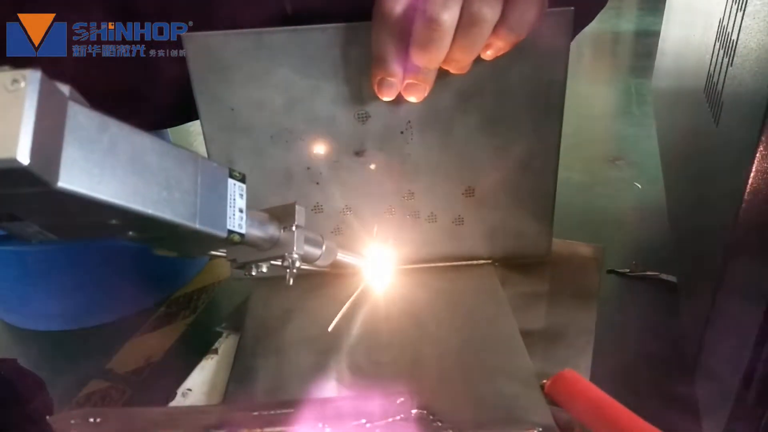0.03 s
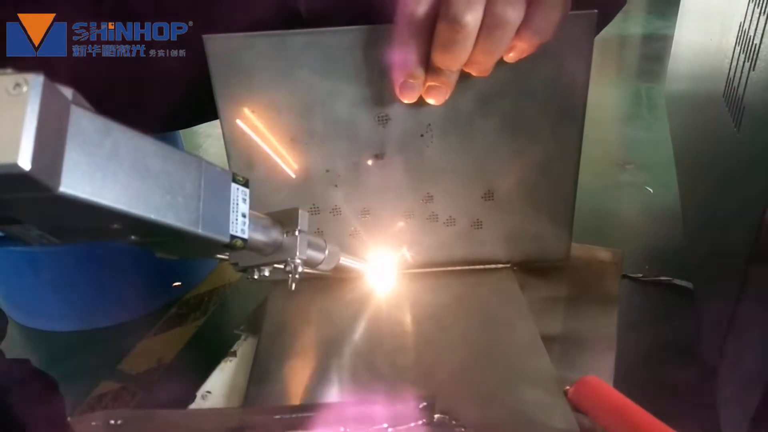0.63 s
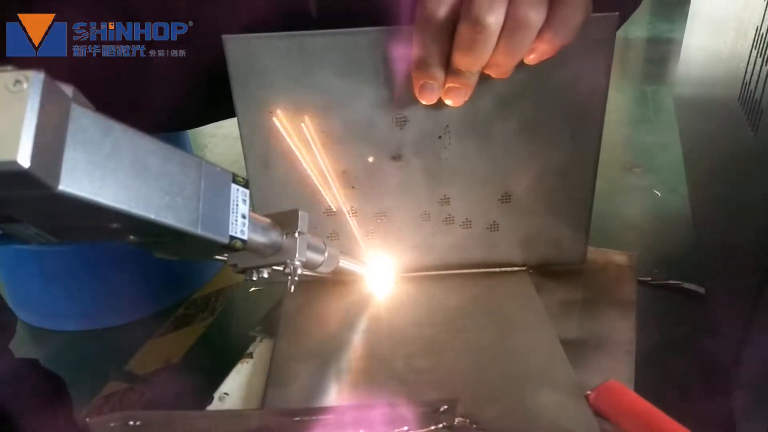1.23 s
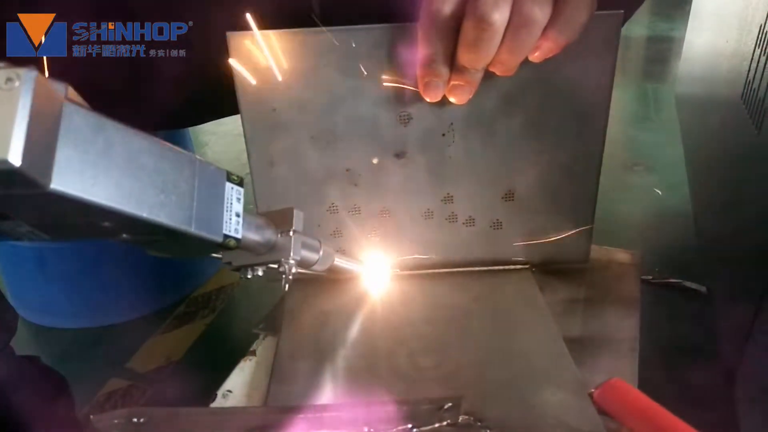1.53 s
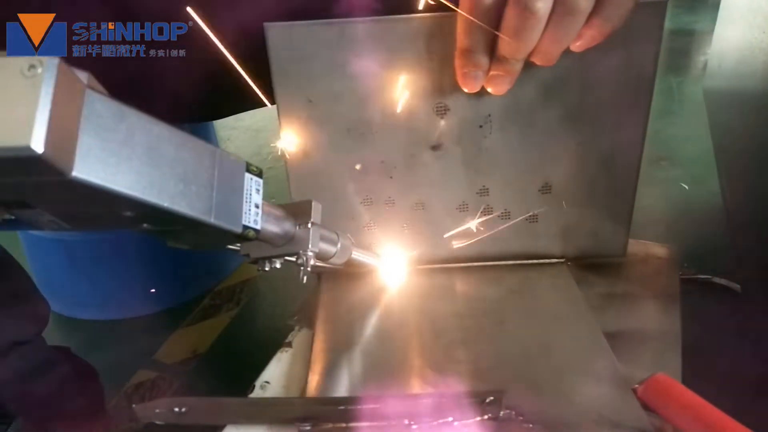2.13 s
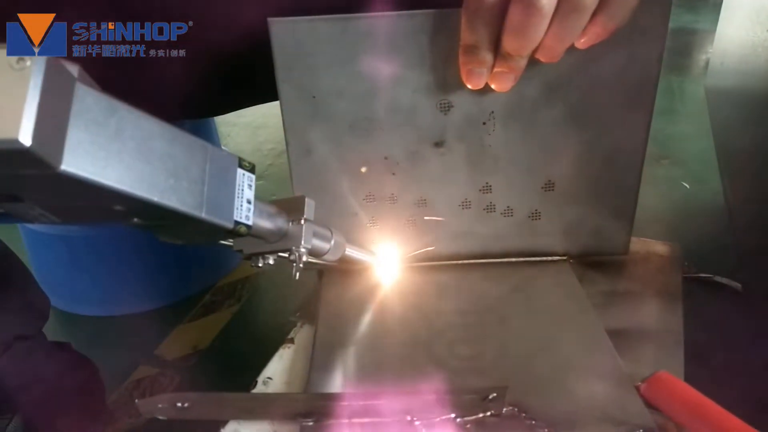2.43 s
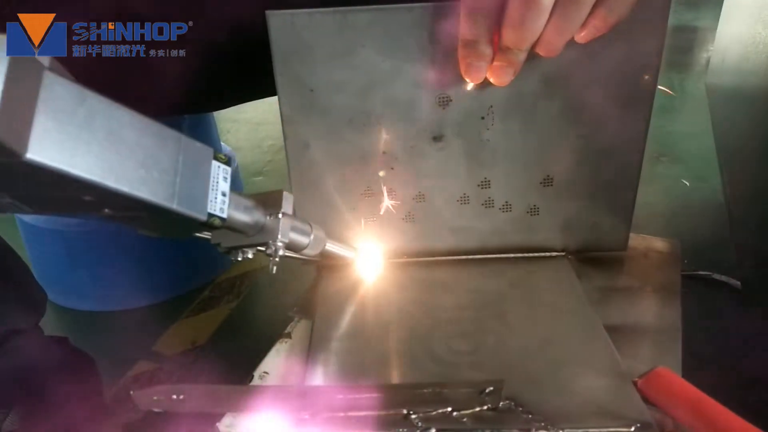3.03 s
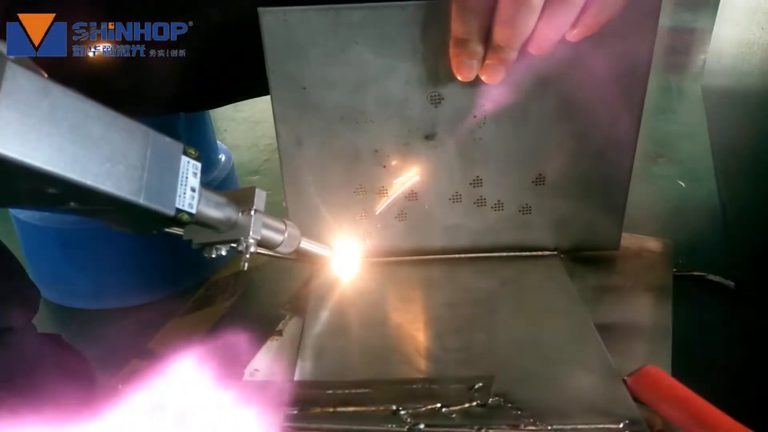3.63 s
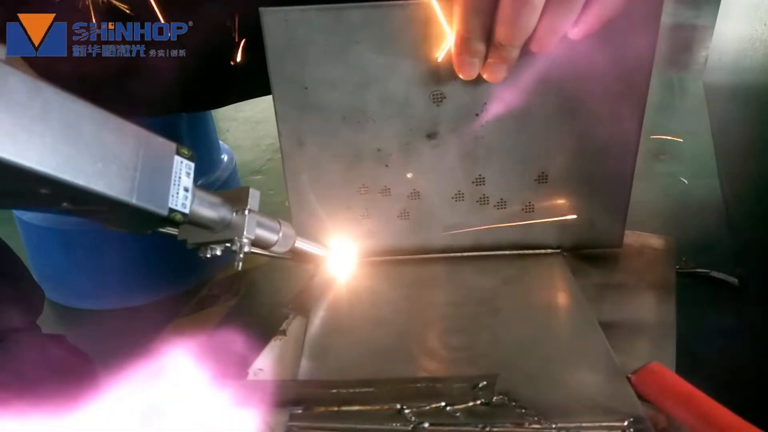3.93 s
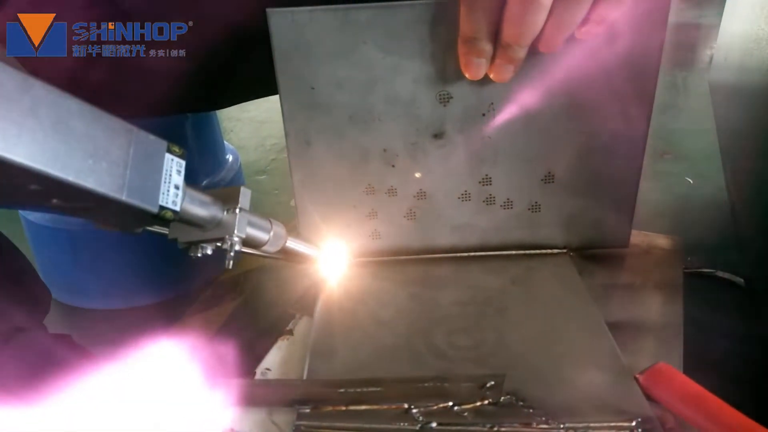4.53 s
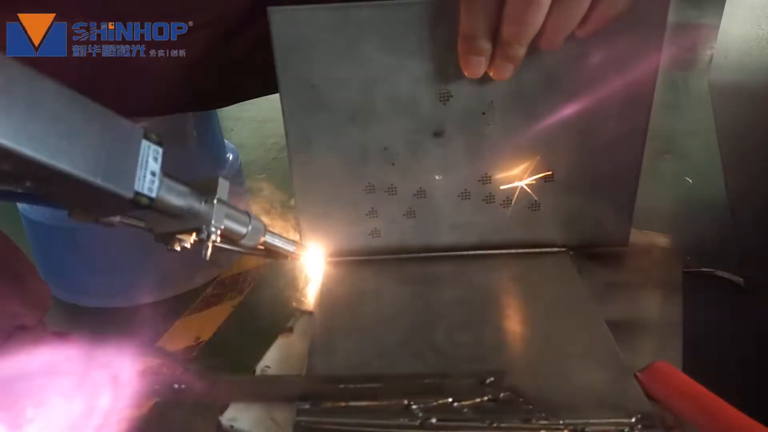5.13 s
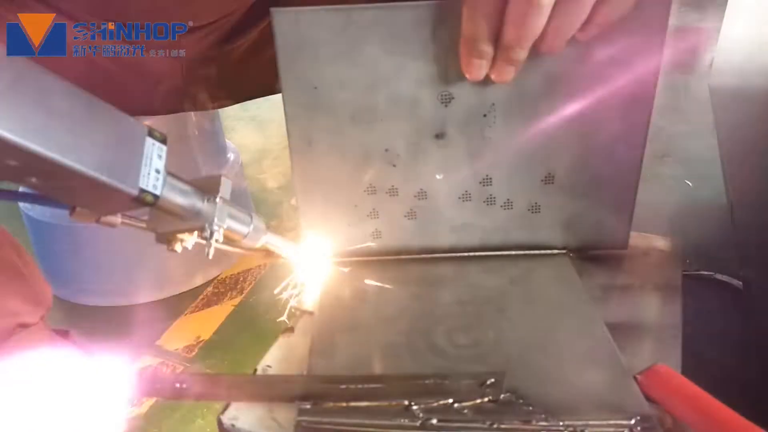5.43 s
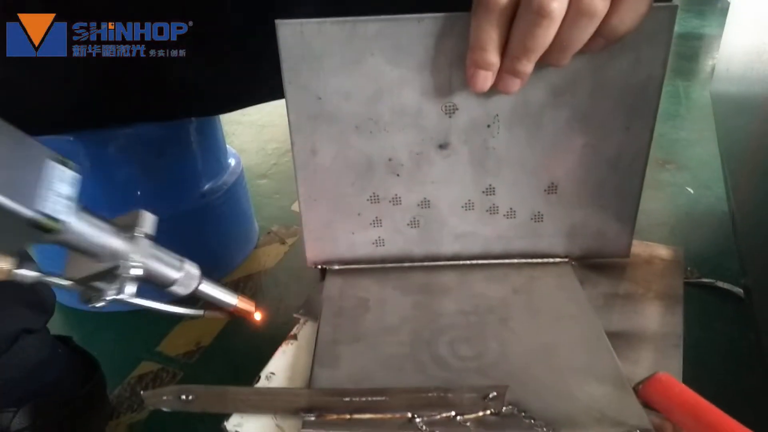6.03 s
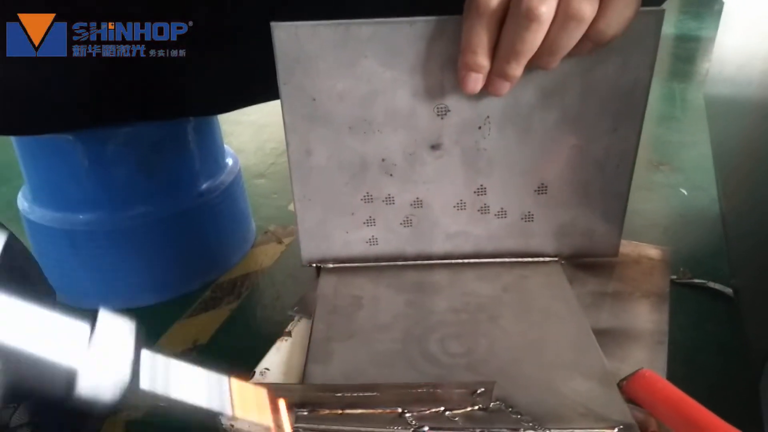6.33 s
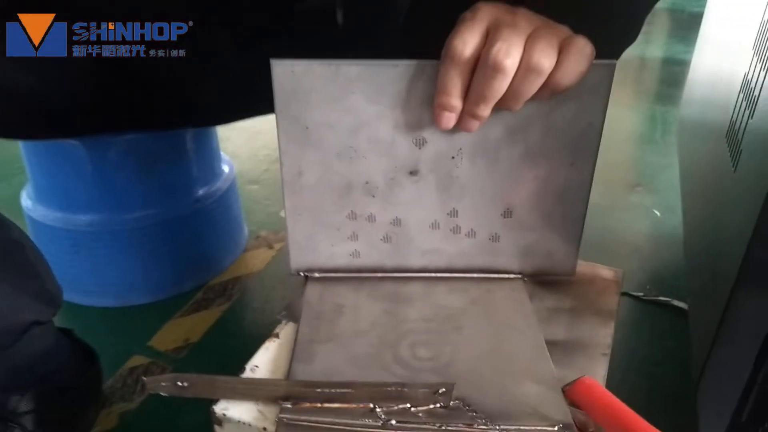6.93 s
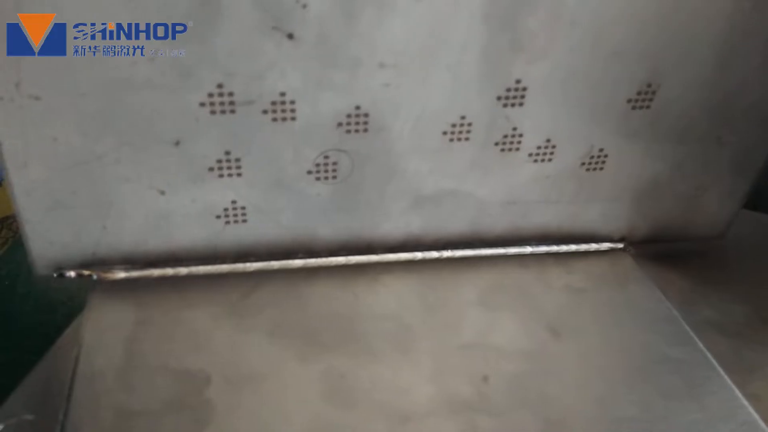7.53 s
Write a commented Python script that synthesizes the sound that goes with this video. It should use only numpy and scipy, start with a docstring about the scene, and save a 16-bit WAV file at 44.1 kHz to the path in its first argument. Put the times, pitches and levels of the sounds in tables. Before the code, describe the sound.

A handheld welding gun hisses and crackles loudly on steel, stops and sputters once, leaving workshop hum and a faint knock.

```python
"""In a workshop, a handheld laser gun welds the corner of two steel sheets.
The swinging beam boils the metal in fifty crackling bursts a second, stops, and sputters once more.
Shield gas whistles through the nozzle until its valve shuts. An automatic gain control turns the
loud weld down; as it recovers, mains hum and room rumble swell. A few knocks ring the bench,
a sleeve and hand brush the steel, and a thin whine steps up near the end."""
import sys
import numpy as np
from scipy import signal
from scipy.fft import rfft, irfft
from scipy.io import wavfile
from scipy.ndimage import uniform_filter1d, minimum_filter1d, map_coordinates

SR = 44100
rng = np.random.default_rng(int(sys.argv[2]) if len(sys.argv) > 2 else 0)


def dump(signal):
    """Clip the signal to [-1, 1] and save it as 16-bit WAV at the path in sys.argv[1]."""
    limited = np.clip(np.atleast_2d(signal).T, -1, 1)
    pcm = np.round(limited * 32767).astype(np.int16)
    wavfile.write(sys.argv[1], SR, pcm)


N = 343098
TIME = np.arange(N) / SR
BINS = np.fft.rfftfreq(4096, 1 / SR)  # the frequencies in Hz at which filters are set

SWING_HZ = 49.981  # swings of the beam per second
TAPER_S, STOP_S = 4.33, 5.24  # the pool of molten metal starts to weaken; the beam stops
SEAM_TIMES_S = [.75, 1.55, 2.5, 4.3]  # when the gun passes the four places below
NOZZLE_TIMES_S = [5.45, 5.8, 6.02, 6.17]  # nozzle leaves the sheet, is clear; flow weakens, is dying

# Resonances of the corner between gun and sheets, at four places along the seam.
# Each row: pitch in Hz, width in Hz, relative level in dB.
SEAM_START = [(1610, 280, -12.5), (1950, 90, -14), (2460, 220, -14), (3010, 410, -12.5), (3440, 47, -5),
              (4160, 890, -13), (4970, 270, -7.5), (5530, 500, -1), (6040, 500, -1), (6490, 270, 3),
              (7150, 630, -2.5), (8230, 570, -12.5), (9300, 1970, -17), (10100, 410, -9),
              (10880, 1440, -9.5), (13100, 250, -10.5), (14400, 1000, -10.5)]
SEAM_EARLY = [(1574, 160, -9), (2220, 3400, -18), (3080, 130, -8.5), (3460, 88, -7), (3900, 120, -10),
              (4230, 180, -4.5), (5000, 230, -3.5), (5600, 980, 0), (6580, 680, -1), (7260, 350, -3),
              (7900, 200, -15), (8480, 140, -9.5), (9000, 610, -11), (10050, 800, -7.5),
              (11600, 2000, -11.0), (14200, 880, -7), (15360, 240, -9.0)]
SEAM_HALFWAY = [(1496, 370, -8.5), (1690, 3000, -11.5), (2270, 64, -4.5), (3110, 76, -4), (3540, 180, 1),
                (3830, 130, -4), (4177, 78, 3.5), (4980, 500, 1), (5740, 1140, 4.5), (6470, 780, 5.5),
                (7120, 230, 0), (8350, 780, -6), (9100, 290, -11), (9520, 180, -3.5), (10300, 740, -3.5),
                (11000, 1100, -3), (13600, 710, -2.5), (14300, 920, -6), (15300, 860, -5)]
SEAM_END = [(1755, 42, -7), (1930, 2900, -21.5), (2316, 170, -9), (3110, 280, -17), (3526, 320, -5),
            (3907, 73, -2.5), (4210, 55, -6), (4940, 160, -2), (5260, 600, 0), (5470, 850, 1),
            (6720, 860, 1), (7810, 140, -15), (8260, 160, -2.5), (8820, 490, -9.5), (9590, 370, -4),
            (10170, 770, -0.5), (11750, 890, -4.5), (13950, 650, -4), (14600, 2000, -6.5)]
# The broad roar under those resonances. Each row: frequency in Hz, relative level in dB.
WELD_ROAR = [(100, -35.5), (300, -29.5), (600, -17.5), (1000, -16.5), (2000, -18), (3000, -22), (4600, -26),
             (8000, -16), (12700, -28), (15500, -46)]
# Surges and lulls of the pool. Each row: middle in seconds, change in dB, half length in seconds.
POOL_SURGES = [(0.205, 0.7, 0.46), (1.15, -0.8, 0.36), (1.42, 1, .12), (1.94, -1, 0.078),
               (4.23, 2.2, 0.054), (4.943, 5, .014), (5.106, 1.5, 0.041), (5.24, -2.5, .05)]
# Drone of the gun's swinging mirror. Each row: multiple of the swing rate, relative level in dB.
MIRROR_TONES = [(3, -71), (8, -62), (11, -69.5)]
# Resonances of the gas nozzle on the sheet, in free air, and as the flow dies.
# Each row: pitch in Hz, width in Hz, relative level in dB.
NOZZLE_ON_SHEET = [(822, 180, -14.5), (1450, 710, -18), (1755, 68, -5.5), (2370, 300, -16), (2990, 460, -9),
                   (3580, 270, -7.5), (4020, 145, -2), (5430, 500, -5), (6760, 254, 2.5), (7520, 240, -8.0),
                   (8940, 450, -19.5), (9850, 390, -14.5), (11240, 210, -17), (13240, 1300, -22),
                   (15120, 410, -24)]
NOZZLE_IN_AIR = [(570, 1700, -0.5), (1830, 160, 7), (2390, 250, 5.5), (2790, 810, 6), (3940, 730, 5),
                 (5540, 390, 12), (6760, 340, 12.5), (7520, 220, 12), (9020, 400, -4.5), (9930, 820, -7.5),
                 (11250, 320, -9.5), (13080, 580, -9.0), (15100, 420, -8)]
NOZZLE_LOW_FLOW = [(1766, 210, 11), (3980, 930, 10.5), (5730, 500, 12), (6700, 400, 12.5), (7250, 400, 11),
                   (9150, 350, -0.5), (9850, 300, -4), (11300, 400, -13), (13100, 500, -10),
                   (15100, 600, -9)]
# The broad rush of the gas jet. Each row: frequency in Hz, relative level in dB.
JET_RUSH = [(100, -42), (300, -26.5), (1000, -26.5), (2500, -18.5), (4600, -22), (8500, -38), (12300, -44),
            (15500, -36)]
# Knocks on the bench. Each row: start in seconds, relative level in dB, brightness in dB per octave.
BENCH_KNOCKS = [(.001, -4, -1), (.176, -2.5, -3), (.193, -9.5, 0), (7.209, -13.5, -1), (7.285, -31, -14)]
# How the bench rings. Each row: pitch in Hz, relative level in dB, seconds to fade by 60 dB.
BENCH_MODES = [(133, -10.5, 0.25), (216, -5, 0.034), (324, -8, 0.029), (462, -1.5, 0.062),
               (580, -15, 0.077), (856, -31, 0.026), (1326, -7.5, 0.07), (1620, -14, .04)]
# Sleeve and hand brushing steel. Each row: start in seconds, peak level in dB, rough length in seconds.
SLEEVE_STROKES = [(6.417, -57.5, 0.18), (6.615, -58, .06), (6.702, -52, 0.11), (6.82, -60, 0.1),
                  (7.159, -53, 0.047), (7.29, -51, .003)]
# The tone colour of that brushing. Each row: frequency in Hz, relative level in dB.
BRUSH_COLOUR = [(1000, -3), (4000, -8), (6500, 7), (10000, 0), (12000, -6), (15000, -7)]
# Transformer hum. Each row: multiple of the mains frequency, level in dB.
HUM_TONES = [(2, -30), (4, -47.5), (6, -44), (8, -66), (10, -57), (16, -62.5)]
# Tones of a fan. Each row: pitch in Hz, relative level in dB.
FAN_TONES = [(862, -54.5), (1030, -65), (348, -52)]
# The rumble of the room. Each row: frequency in Hz, relative level in dB.
RUMBLE_COLOUR = [(20, -15), (50, -27), (90, 2.5), (140, 1), (250, -6.5), (450, -11), (800, -13),
                 (2200, -18.5), (3200, -24), (4300, -26), (5500, -33.5), (7000, -35.5), (10000, -44),
                 (12000, -51), (15500, -54)]
# Soft swells of the rumble. Each row: middle in seconds, change in dB, half length in seconds.
RUMBLE_SWELLS = [(5.044, 3, 0.054), (5.55, 0, 0.038), (6.075, 3.5, 0.078)]
# A thin whine in the room. Each row: pitch in Hz, width in Hz, relative level in dB.
WHINE_BANDS = [(802, 15, 8), (4550, 165, 0), (6570, 400, -17), (9400, 360, -21)]


def weld(boil_db=-10, taper_db_per_s=8.5, calm_db_per_s=2.5, buzz_db=-29, mirror_db=17):
    """The boiling pool hisses through the changing corner while the swinging mirror drones."""
    lag_s = 0.0025 - 0.0031 * (TIME > 2.02)  # the rhythm skips ahead once
    calm = gain_of(-calm_db_per_s * since(TAPER_S))  # a weaker pool simmers less between bursts
    flow = bursts(lag_s, return_db=-15, width_s=.0036, warmth=.32 * calm, simmer=.19 * calm)
    vapour = echoes(boil(flow))
    hiss = morph(vapour, SEAM_TIMES_S, (SEAM_START, SEAM_EARLY, SEAM_HALFWAY, SEAM_END), WELD_ROAR)
    # each burst also pushes the air: a faint low buzz
    buzz = colour(flow - flow.mean(), slope([(50, -19.5), (100, -17.5), (150, 11.5), (500, .5), (1500, 3)]))
    mirror = sum(gain_of(db + mirror_db) * tone(k * SWING_HZ) for k, db in MIRROR_TONES)
    surge_db = sum(bump(*row) for row in POOL_SURGES) + .5 * drift(4.1)
    pool_db = boil_db - taper_db_per_s * since(TAPER_S) + surge_db
    pool = gain_of(pool_db) * (hiss + gain_of(buzz_db) * buzz)
    return between(0, STOP_S, 0.018) * (pool + mirror)


def sputter(start_s=5.48, peak_s=5.527, end_s=5.695, peak_db=-18.5, rise_db_per_s=50, fall_db_per_s=94):
    """The beam fires again at the sheet's open edge: shorter, brighter bursts that soon starve."""
    return_db = np.where(TIME < start_s + .066, 1, -24)  # at first the swing back bites too
    flow = bursts(0.0097, return_db, width_s=.0025, warmth=.15, simmer=.09)
    open_edge = slope([(200, -4), (1000, -9), (3000, -7), (5500, 2.5), (8000, -2), (10500, 0.5),
                       (12500, -4), (14500, -1), (15700, -6.5)])
    level_db = peak_db - rise_db_per_s * np.maximum(peak_s - TIME, 0) - fall_db_per_s * since(peak_s)
    return gain_of(level_db) * between(start_s, end_s, 0.0022) * colour(boil(flow), open_edge)


def bursts(lag_s, return_db, width_s, warmth, simmer, jitter_s=0.00013, uneven_db=0.63):
    """Strength of the vapour flow: it flares as the beam crosses the joint, and on the swing back."""
    clock = TIME - lag_s + jitter_s * drift(31)

    def seconds_from(delay_s):
        """Time to the nearest crossing, shifted by delay_s."""
        return abs(((clock - delay_s) * SWING_HZ + .5) % 1 - .5) / SWING_HZ
    flare = np.exp(-(seconds_from(0) / width_s) ** 3.27)
    warming = warmth * np.exp(-(seconds_from(-0.0023) / 0.011) ** 2)
    swing_back = gain_of(return_db) * np.exp(-(seconds_from(0.0074) / 0.0025) ** 2)
    flow = np.sqrt(flare ** 2 + warming ** 2 + swing_back ** 2 + simmer ** 2)
    return evened(flow * gain_of(uneven_db * drift(28)))


def boil(flow, crackle_db=0.64, split_hz=3500, fizz_hz=11000):
    """Tiny vapour pops follow the bursts; the low roar and the finest fizz flow more evenly."""
    pops = evened(flow * noise() * gain_of(crackle_db * drift(420)))
    stream = evened(flow ** 0.27 * noise())
    roar = let_through(stream, "low", split_hz)
    fizz = 0.74 * let_through(stream, "high", fizz_hz)
    return let_through(pops, "high", split_hz) + roar + fizz


def echoes(x):
    """Adds short echoes off gun and sheets; their delays slide as the gun travels, so the hiss phases."""
    # Each row: delay in seconds, change of that delay per second, gain.
    paths = [(.00025, .000055, .12), (.00097, -.000002, .1), (.00204, -.000015, .15), (.00256, 0, .08)]
    bounced = sum(gain * np.interp(TIME - s - slide * TIME, TIME, x) for s, slide, gain in paths)
    return evened(x + bounced)


def shield_gas(gas_db=-23, buried_db=-1.5, free_air_db=-6, valve_s=5.917, empty_s=0.43):
    """Swirling gas sounds the resonances of the nozzle tube until the valve shuts and the hose empties."""
    states = (NOZZLE_ON_SHEET, NOZZLE_IN_AIR, NOZZLE_IN_AIR, NOZZLE_LOW_FLOW)
    jet = morph(noise(), NOZZLE_TIMES_S, states, JET_RUSH)
    lifted = np.minimum(since(NOZZLE_TIMES_S[0]) / .2, 1)
    pressure = np.maximum(1 - since(valve_s) / empty_s, 0)
    # the pitch wavers with the hand and sags as the pressure falls
    pitch = 1 + 0.0046 * drift(3) * lifted - .04 * (1 - pressure) ** 2
    jet = map_coordinates(jet, [np.cumsum(pitch)], order=5, mode="reflect")
    # quieter while the nozzle is buried in the corner, and once it lifts clear
    level_db = gas_db + buried_db * between(0, STOP_S, .1) + free_air_db * lifted
    last_puff_db = bump(6.1, db=4, half_s=0.013)
    flutter_db = 1.2 * drift(12)
    return gain_of(level_db + last_puff_db + flutter_db) * pressure ** 1.5 * jet


def knocks(crack_db=-6, crack_fade_s=0.041, tail_db=-23, tail_fade_s=0.79):
    """Each blow rings the bench; a dull crack and a short room tail go with it."""
    out, t = np.zeros(N), TIME[:SR // 2]
    dull = slope([(60, -21), (200, 9), (550, -3.5), (900, -4.5), (1600, -3.5), (3500, -17.5),
                  (6000, -40), (15000, -48)])
    attack = 1 - np.exp(-t / 0.002)
    fade = gain_of(crack_db - 60 * t / crack_fade_s) + gain_of(tail_db - 60 * t / tail_fade_s)
    for start_s, db, brightness in BENCH_KNOCKS:
        ring = np.zeros(len(t))
        for k, (hz, mode_db, fade_s) in enumerate(BENCH_MODES):
            level = gain_of(mode_db + brightness * np.log2(hz / 300) - 60 * t / fade_s)
            ring += (-1) ** k * level * np.sin(2 * np.pi * hz * t)
        tilt = gain_of(brightness * np.log2(BINS / 300 + 0.22))
        crack = colour(noise(), dull * tilt)[:len(t)]
        add(out, start_s, gain_of(db) * (.5 * ring + crack * fade) * attack)
    return out


def rustles(grain_db=1.5):
    """Sleeve and hand rub the steel: grainy brushes that swell quickly and die away."""
    level = np.zeros(N)
    for start_s, db, length_s in SLEEVE_STROKES:
        age = since(start_s) / (length_s / 3)
        level += gain_of(db) * age * np.exp(1 - age)
    grains = noise() * gain_of(grain_db * drift(500))
    return level * colour(grains, slope(BRUSH_COLOUR))


def workshop(mains_hz=50, fan_db=-1, rumble_db=-37.5, step_s=7.3, step_db=1):
    """A transformer and a fan hum in the room's rumble; at step_s whine and hum rise, the rumble drops."""
    late = between(step_s, np.inf, .03)
    hum = gain_of(step_db * late) * sum(gain_of(db) * tone(k * mains_hz) for k, db in HUM_TONES)
    fan = sum(gain_of(db + fan_db) * tone(hz) for hz, db in FAN_TONES)
    swell_db = sum(bump(*row) for row in RUMBLE_SWELLS) - step_db * late + 0.67 * drift(9.6)
    rumble = gain_of(rumble_db + swell_db) * colour(noise(), slope(RUMBLE_COLOUR))
    whine = gain_of(-64.5 + 9.5 * late) * colour(noise(), resonances(WHINE_BANDS))
    whine_tone = late * gain_of(-56) * tone(hz=802)
    return hum + fan + rumble + whine + whine_tone


def gain_control(x, limit_db=-25.5, sense_s=0.4, hold_s=0.37, recover_db_per_s=13):
    """Gain in dB: turns down what is over the limit, holds, then recovers at a steady rate."""
    power = uniform_filter1d(x ** 2, int(sense_s * SR))
    needed_db = np.minimum(limit_db - 10 * np.log10(abs(power) + 1e-12), 0)
    half = int(hold_s * SR / 2)
    held_db = minimum_filter1d(needed_db, 2 * half + 1, origin=half)
    climb_db = recover_db_per_s * TIME
    return np.minimum.accumulate(held_db - climb_db) + climb_db


def morph(x, times, states, base):
    """Sounds x through sets of resonances over a broad base, fading from one set to the next."""
    return sum(np.interp(TIME, times, share) * colour(x, np.hypot(resonances(modes), slope(base)))
               for share, modes in zip(np.eye(len(states)), states))


def resonances(modes):
    """A filter curve with one steep peak per row; their powers add."""
    f = BINS + 1
    peaks = [gain_of(db) / (1 + ((f * f - hz * hz) / (f * width)) ** 2) for hz, width, db in modes]
    return np.sqrt(sum(peak ** 2 for peak in peaks))


def slope(points):
    """A filter curve drawn through points of frequency in Hz and level in dB."""
    hz, db = np.transpose(points)
    return gain_of(np.interp(np.log(BINS + 1), np.log(hz), db))


def colour(x, curve):
    """Filters x by the curve, ringing only after each sound, and scales it to strength 1."""
    log_gain = np.log(np.maximum(np.r_[curve, curve[-2:0:-1]], 1e-5))
    ring = np.fft.ifft(np.exp(np.conj(signal.hilbert(log_gain)))).real
    return evened(signal.oaconvolve(x, ring)[:N])


def let_through(x, side, hz):
    """Keeps the part of x on the "low" or "high" side of hz."""
    return signal.lfilter(*signal.butter(3, hz, side, fs=SR), x)


def tone(hz):
    """A slightly wavering sine of strength about 1."""
    level = np.sqrt(2) * gain_of(.5 * drift(12))
    return level * np.sin(2 * np.pi * (hz * TIME + rng.random()) + 0.088 * drift(12))


def drift(hz):
    """A random wander of strength 1, with up to about hz changes a second."""
    f = np.fft.rfftfreq(N, 1 / SR)
    return evened(irfft(rfft(noise()) * np.exp(-(f / hz) ** 2), N))


def noise():
    """White noise."""
    return rng.standard_normal(N)


def bump(s, db, half_s):
    """A smooth swell or dip in dB around time s."""
    return db * np.exp(-((TIME - s) / half_s) ** 2)


def between(start_s, end_s, fade_s):
    """1 from start to end, with short ramps to 0 outside."""
    return np.clip(np.minimum(TIME - start_s, end_s - TIME) / fade_s + 1, 0, 1)


def since(s):
    """Seconds gone by since time s, zero before."""
    return np.maximum(TIME - s, 0)


def gain_of(db):
    """Turns decibels into a multiplier."""
    return 10 ** (np.asarray(db) / 20)


def evened(x):
    """Scales x to an average strength (rms) of 1."""
    return x / np.sqrt(np.mean(x ** 2) + 1e-20)


def add(mix, s, sound):
    """Mixes a sound in at time s."""
    part = mix[max(round(s * SR), 0):][:len(sound)]
    part += sound[:len(part)]


def scene():
    """All the sources together in one channel."""
    return (weld() + sputter() + shield_gas() + workshop() + knocks() + rustles())[None]


def record(dry, top_hz=15700):
    """Gain control turns the loud parts down, the level dips once, and the highest treble is cut."""
    dip_db = bump(4.62, db=-2, half_s=0.4)
    ducked = dry * gain_of(gain_control(dry[0]) + dip_db)
    treble_cut = signal.firwin(401, top_hz, window=("kaiser", 9), fs=SR)
    return signal.oaconvolve(ducked, treble_cut[None], "same")


dry = scene()
out = record(dry)
dump(out)
```